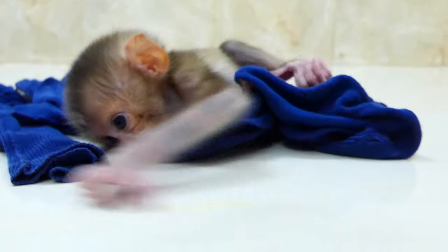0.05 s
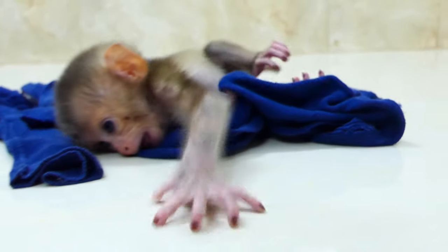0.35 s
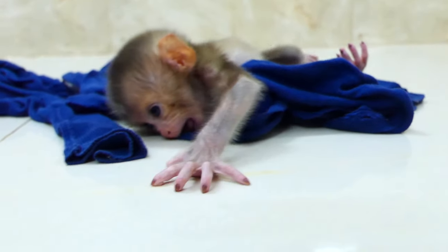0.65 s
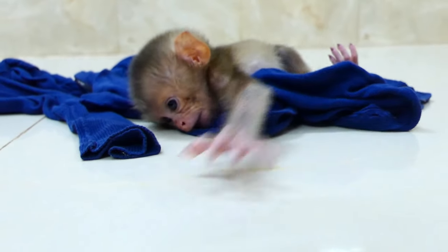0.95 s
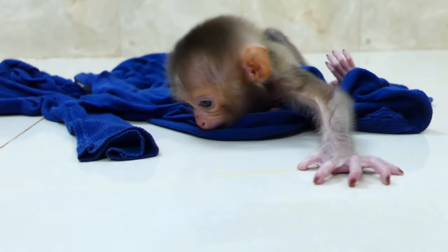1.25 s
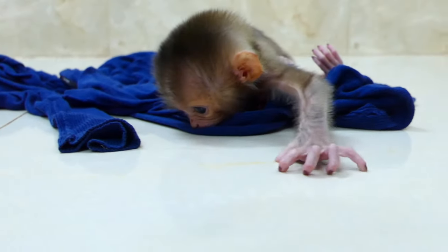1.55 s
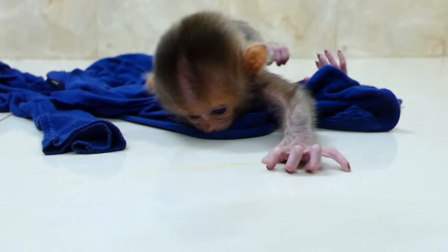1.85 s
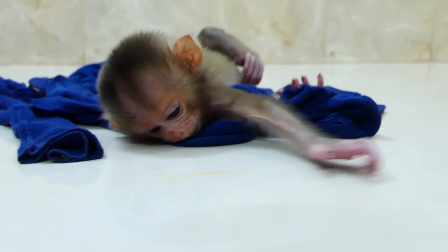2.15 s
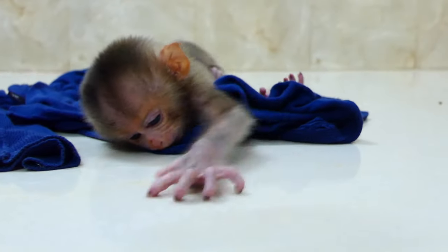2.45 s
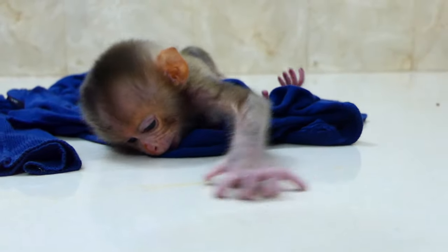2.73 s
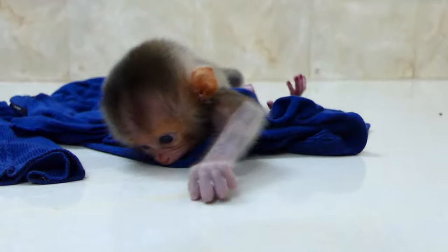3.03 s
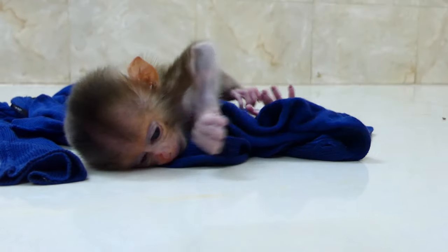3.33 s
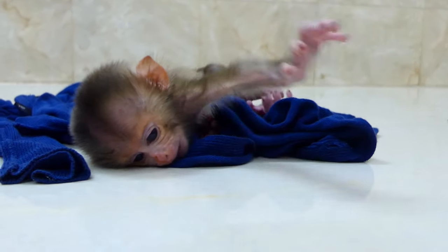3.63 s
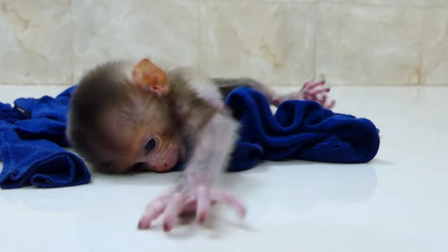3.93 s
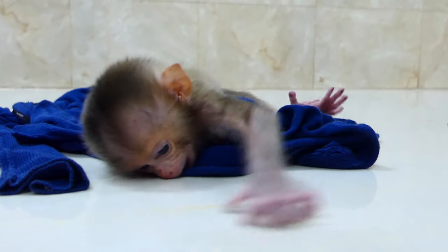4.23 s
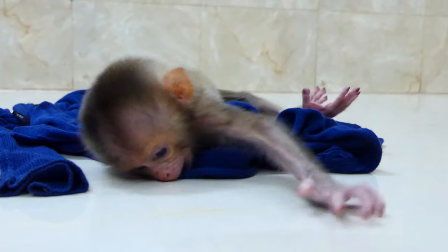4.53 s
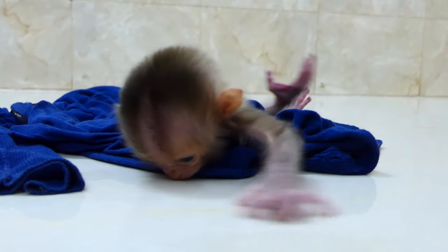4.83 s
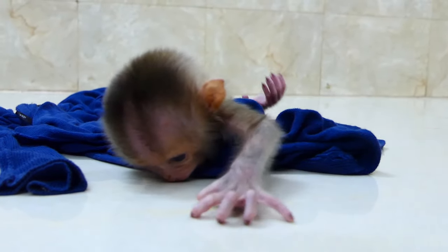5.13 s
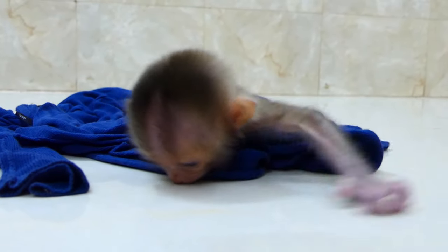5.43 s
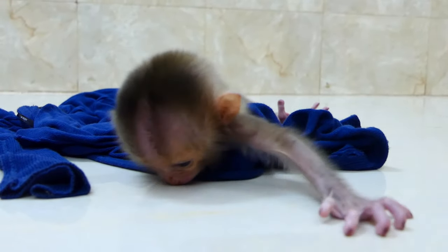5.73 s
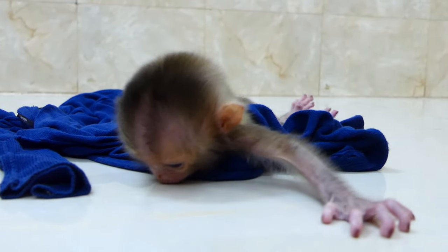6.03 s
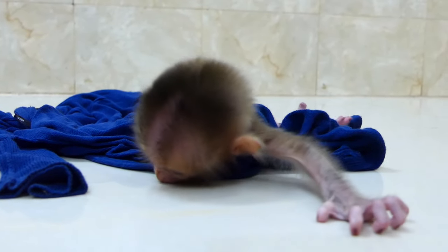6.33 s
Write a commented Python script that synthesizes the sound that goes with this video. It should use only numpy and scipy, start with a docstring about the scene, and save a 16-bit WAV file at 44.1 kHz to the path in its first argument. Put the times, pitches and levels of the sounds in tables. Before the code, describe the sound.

A baby monkey cries ten times, close by in a tiled room. Each call is a short, shrill, ragged scream that starts hard, then falls in pitch and darkens, sometimes with a thin whistle breaking through. Three cries come first, then a pause with soft scuffs of hands and cloth, then seven more about half a second apart. The tiles ring after each cry over a low, steady room noise.

```python
"""In a tiled room, a baby monkey crawls over a cloth on the floor and cries ten times.
Its vocal folds make shrill, ragged screams that start hard, fall in pitch and darken as the mouth
closes; now and then a pure whistle breaks out. Hands and cloth scuff softly over a low room noise.
The tiles ring after each cry. A camera's gain control turns the loud cries down and lets the echo
swell back."""
import sys
import numpy as np
from scipy import signal
from scipy.fft import rfft, irfft, next_fast_len
from scipy.io import wavfile
from scipy.ndimage import uniform_filter1d, map_coordinates

SR = 44100
rng = np.random.default_rng(int(sys.argv[2]) if len(sys.argv) > 2 else 0)


def unload_audio(sound):
    """Save the sound as a 16-bit wav file, at the path given as the first command line argument."""
    columns = np.transpose(np.atleast_2d(sound))
    # keep every value between -1 and 1, then stretch to whole-number steps
    steps = np.round(np.clip(columns, -1, 1) * 32767)
    wavfile.write(sys.argv[1], SR, steps.astype(np.int16))


N = 285768
TOP_HZ = 15700  # the highest frequency kept

# Tone of the low room noise: (frequency [Hz], relative level [dB])
BACKGROUND_COLOUR = [(18, -51), (30, -28), (140, -8.5), (175, 2), (270, -3.5), (455, -13.5), (1170, -13),
                     (2300, -16), (12000, -31), (15500, -57)]
# Stereo width of the room noise: (frequency [Hz], side over middle [ratio])
BACKGROUND_WIDTH = [(40, 0.81), (170, 0.21), (600, 0.47)]
# How long the room rings: (frequency [Hz], time to fade by 60 dB [s])
ECHO_DECAY = [(1500, 0.72), (2900, 0.72), (4800, 0.73), (14000, 0.54)]
# Tone of the echo: (frequency [Hz], gain [dB])
ECHO_COLOUR = [(1300, 1.5), (2050, -5.5), (2950, 1.46), (4800, -1), (7500, 2.5), (10000, -2), (13000, -7.5)]
# Stereo width of the echo: (frequency [Hz], side over middle [ratio])
ECHO_WIDTH = [(1000, 0.53), (7000, 0.25), (12000, 0.58)]
# Stereo width of the direct sound: (frequency [Hz], side over middle [ratio])
DIRECT_WIDTH = [(9000, 0.15), (13000, 0.38)]
# Hands and cloth sliding: (time [s], length [s], slide level [dB], rub frequency [Hz], rub level [dB])
SLIDES = [(0.451, 0.15, -31.5, 850, -49), (1.934, 0.35, -53, 1480, -43.5),
          (2.329, 0.093, -45.5, 3240, -41.5)]
# Tone of a slide: (frequency [Hz], relative level [dB])
SLIDE_COLOUR = [(59, -50), (115, -7.5), (330, 3), (800, 1.5), (3000, -11.5), (5280, -120)]
# A finger or nail on the tiles: (time [s], level [dB], ring [Hz])
FINGER_TAPS = [(2.809, -32.5, 1800)]
# Where throat and mouth ring: (frequency [Hz], width [Hz], gain [dB])
THROAT_RESONANCES = [(2895, 410, -2), (3870, 4000, 1.5), (6270, 2230, 1), (7520, 1030, -5.5),
                     (9100, 3220, 2), (11800, 2300, -4.5)]
# Strength of the mouth's moving resonance, weakest midway: (frequency [Hz], gain [dB])
MOUTH_STRENGTH = [(3800, 8), (5600, -2.5), (9000, 9)]
# Muffling by closed lips: (frequency [Hz], gain [dB])
LIP_MUFFLING = [(5000, -4), (10500, -4.5), (14000, -20)]
# Tone of the throaty undertone: (frequency [Hz], relative level [dB])
CHEST_COLOUR = [(500, -19), (850, -1), (1800, 1.5), (2800, -22)]
# Glides of a second vibration in the voice box:
# (time [s], length [s], first pitch [Hz], last pitch [Hz], level [dB], roughness [0-1])
WHISTLE_GLIDES = [(0.158, 0.041, 8370, 6840, -15, 0.22), (0.184, 0.044, 9650, 9460, -14.5, 0.15),
                  (0.672, 0.022, 12200, 8800, -14, 0.35), (1.229, 0.025, 5440, 5740, -17, 0.25),
                  (1.227, 0.031, 10780, 10260, -15.5, 0.36), (2.861, 0.026, 9870, 9490, -13, 0.05),
                  (2.943, 0.024, 10850, 7500, -16.5, .35), (3.424, 0.011, 4530, 3190, -10, .2),
                  (3.505, 0.016, 8100, 6830, -17.5, 0.12), (4.132, 0.02, 8170, 7280, -14.5, 0.38),
                  (4.56, 0.014, 10420, 8960, -14, .4), (5.008, 0.025, 6660, 6630, -7, 0.45),
                  (5.059, 0.0237, 4370, 3740, -12, 0.55), (5.48, 0.018, 3400, 4000, -15.5, .45),
                  (5.499, 0.012, 3875, 4130, -9.5, 0.01), (5.584, 0.048, 6900, 4920, -9.5, 0.36),
                  (5.979, 0.016, 4040, 4600, -7, 0.42), (5.99, 0.039, 6680, 6710, -8, 0.5)]
# Catches of the voice: (time [s], length [s], first pitch [Hz], last pitch [Hz], mouth resonance [Hz],
# level [dB], brightness [dB per octave], roughness [0-1])
YELP_GLIDES = [(0.269, 0.019, 3765, 3360, 9960, -15, 3, 0.75),
               (0.76, 0.013, 2890, 3415, 3240, -8, -22, 0.5),
               (1.155, 0.044, 4700, 5270, 10000, -26, 9, 0.65),
               (3.412, 0.015, 1420, 1605, 3200, -10.5, -12, 0.18),
               (3.519, 0.0082, 3650, 3310, 3500, -5.5, -25, 0.55),
               (4.197, 0.023, 1855, 1403, 2900, -8.5, -46, 0.4),
               (4.578, 0.014, 1507, 1410, 3200, -7, -13, 0.2),
               (5.004, 0.027, 2285, 2504, 4560, -12, 1, 0.77),
               (5.135, 0.022, 902, 806, 3630, -8, -16, 0.55),
               (5.621, 0.014, 1388, 1720, 3200, -6.5, -44, 0.64),
               (6.091, 0.013, 3040, 3110, 3030, -2, -19, 0.82),
               (6.139, 0.019, 1029, 929, 2770, -10.5, -27, 0.43)]
# Screams, held high before they break and fall: (time [s], attack [s], hold [s], fall [s],
# mouth closing [s], scoop up to the pitch [octaves], held pitch [Hz], last pitch [Hz], open mouth [Hz],
# closed mouth [Hz], held level [dB], break level [dB], falling level [dB],
# held brightness [dB per octave], falling brightness [dB per octave], held roughness [0-1],
# falling roughness [0-1], period doubling [0-1])
SCREAMS = [(0.151, 0.0012, 0.059, 0.034, 0.019, -0.22, 4993, 3160, 10500, 3340, -16.5, -10.5, -16, -1, 5, 0.36, 0.2, 0.17),
           (.603, 0.0028, 0.08, 0.074, 0.05, 0.29, 5930, 2151, 10500, 2980, -11, -10, -4.5, 2.5, -16, 0.81, 0.41, 0.59),
           (1.198, 0.039, 0.1, 0.066, 0.057, 0.15, 5150, 2750, 9950, 3020, -11.5, -5, -9.5, 4, -33, 0.78, 0.43, 0.32),
           (2.859, 0.0034, 0.087, 0.079, 0.042, .35, 5327, 1949, 10230, 2870, -10, -13, -6.5, 4, -70, 0.87, 0.6, 0.17),
           (3.408, 0.011, 0.093, 0.077, 0.033, 0.23, 4784, 2500, 10030, 3010, -9, -12.5, -7, -0.5, -46, 0.91, 0.51, 0.35),
           (4.055, 0.0069, 0.076, .066, 0.026, .2, 4090, 2303, 9970, 2810, -12.5, -9, -2, -1.5, -39, 0.98, 0.43, 0.34),
           (4.552, 0.0057, .105, .062, 0.046, .5, 4682, 1685, 10000, 2700, -10, -14.5, -3, -0.5, -63, 0.73, 0.53, 0.69),
           (4.993, 0.0057, 0.085, 0.081, 0.03, 0.21, 3605, 1550, 8660, 3040, -19.5, -7.5, -5.5, 0.5, -10, 0.65, 0.5, 0.62),
           (5.453, 0.0012, 0.118, 0.039, 0.038, 0.46, 4012, 3225, 9200, 3670, -14.5, -8.5, -11, -2.5, 4, 0.63, 0.27, 0.95),
           (5.968, 0.0079, 0.12, 0.059, 0.035, -.15, 3498, 1250, 6700, 2780, -12, -10.5, -9, 1, -27, 0.6, 0.52, 0.64)]


def amp(db):
    """Turn decibels into a gain."""
    return 10 ** (np.asarray(db) / 20)


def unit(x):
    """Scale x to an average (rms) level of 1."""
    return x / np.sqrt(np.mean(x ** 2) + 1e-20)


def along(points, hz):
    """Read between (frequency, value) points on a log frequency axis."""
    frequencies, values = np.transpose(points)
    return np.interp(np.log(hz + 1), np.log(frequencies + 1), values)


def wobble(rate, n):
    """A smooth curve of n samples through `rate` random values a second."""
    return map_coordinates(rng.standard_normal(int(n * rate / SR) + 4), [np.arange(n) * rate / SR])


def filtered(x, response):
    """Multiply each frequency in x by response(hz)."""
    n = x.shape[-1]
    padded = next_fast_len(n + SR // 10)
    return irfft(rfft(x, padded) * response(np.fft.rfftfreq(padded, 1 / SR)), padded)[..., :n]


def add(track, start, sound):
    """Mix a sound into the track at `start` seconds."""
    part = track[round(start * SR):][:len(sound)]
    part += sound[:len(part)]


def gate(n, rise, fall):
    """A straight fade in and fade out over n samples; rise and fall are in seconds."""
    t = np.arange(n) / SR
    return np.clip(np.minimum(t / rise, t[::-1] / fall), 0, 1)


def noise(colour, shape):
    """Noise of level 1 with the given tone."""
    return unit(filtered(rng.standard_normal(shape), lambda hz: amp(along(colour, hz))))


def resonate(x, hz, width):
    """Let x ring around a frequency, which may move."""
    turn = np.exp(2j * np.pi * np.cumsum(hz * np.ones(len(x))) / SR)
    keep = np.exp(-np.pi * width / SR)
    return 2 * np.real(turn * signal.lfilter([1 - keep], [1, -keep], x / turn))


def steep_resonance(x, hz, width):
    """The same resonance twice, so less gets past its sides."""
    return resonate(resonate(x, hz, width), hz, width)


def stereo(mid, side, width):
    """Left and right: what both share, plus or minus a side signal scaled by the width table."""
    side = filtered(side, lambda hz: along(width, hz))
    return np.array([mid + side, mid - side])


def room_noise(db=-41):
    """The steady, low background of the house."""
    mid, side = noise(BACKGROUND_COLOUR, (2, N))
    return amp(db) * stereo(mid, side, BACKGROUND_WIDTH)


def room_echo(x, buildup_s=0.14):
    """Reflections from the tiles build up and die away, the highest treble first."""
    hz, t, spectrum = signal.stft(rng.standard_normal((2, SR)), SR, nperseg=256)
    decay = amp(-60 * t / along(ECHO_DECAY, hz)[:, None])
    buildup = 1 - np.exp(-t / buildup_s) / 2
    tail = signal.istft(spectrum * decay * buildup, SR, nperseg=256)[1]
    coloured = filtered(x, lambda hz: amp(along(ECHO_COLOUR, hz)))
    mid, side = signal.fftconvolve(coloured[None], tail / np.linalg.norm(tail[0]), axes=1)[:, :N]
    return stereo(mid, side, ECHO_WIDTH)


def low_hum(start=3.25, length=0.11, hz=298, waver_hz=25, db=-34):
    """A brief, faint hum with a wavering pitch."""
    track, n = np.zeros(N), int(length * SR)
    phase = 2 * np.pi * np.cumsum(hz + waver_hz * wobble(78, n)) / SR
    add(track, start, amp(db) * unit(np.sin(phase)) * gate(n, length / 2, length / 2))
    return track


def crawling(grip_db=3.0, grip_rate=150, rub_width=0.86):
    """Hands and cloth grip unevenly: each slide starts fast and runs out, and a rub swells midway."""
    track = np.zeros(N)
    for start, length, db, rub_hz, rub_db in SLIDES:
        n = int(length * SR)
        slide = noise(SLIDE_COLOUR, n) * amp(db) * gate(n, length / 20, length / 2)
        rub = steep_resonance(rng.standard_normal(n), rub_hz, rub_width * rub_hz)
        rub = unit(rub) * amp(rub_db) * gate(n, length / 2, length / 2)
        add(track, start, (slide + rub) * amp(grip_db * wobble(grip_rate, n)))
    return track


def finger_tap(width_hz=1500, decay_s=0.012):
    """A light touch on the tiles makes a small tick that dies quickly."""
    track, t = np.zeros(N), np.arange(SR // 10) / SR
    for start, db, hz in FINGER_TAPS:
        tick = unit(resonate(rng.standard_normal(len(t)), hz, width_hz))
        add(track, start, tick * amp(db - 60 * t / decay_s))
    return track


def wheeze(start=1.14, length=0.14, first_hz=1550, last_hz=2400, width_hz=800, db=-35):
    """A faint, rising rasp from the monkey leads into the third cry."""
    track, n = np.zeros(N), int(length * SR)
    rasp = steep_resonance(rng.standard_normal(n), np.geomspace(first_hz, last_hz, n), width_hz)
    add(track, start, amp(db) * unit(rasp) * gate(n, length / 4, length / 10))
    return track


def strained_phase(pitch, rough, jitter=0.0595, jitter_rate=2000, lurch=0.04, lurch_rate=220):
    """The phase of a strained vibration: its pitch shakes fast and lurches every few milliseconds."""
    shakes = jitter * rough * wobble(jitter_rate, len(pitch))
    lurches = lurch * np.sqrt(rough) * wobble(lurch_rate, len(pitch))
    return 2 * np.pi * np.cumsum(pitch * (1 + shakes + lurches)) / SR


def vocal_folds(pitch, rough, doubling, pulse_depth=0.77):
    """The folds buzz with many overtones; roughness turns the buzz into pulsing noise."""
    phase = strained_phase(pitch, rough)

    def overtones(multiples):
        return np.sum(np.cos(multiples * phase) * (multiples * pitch < TOP_HZ), axis=0)

    whole = np.arange(1, 20)[:, None]
    tone = overtones(whole) + doubling * overtones(whole + 0.5)  # period doubling adds tones in between
    tone *= 2 * np.sqrt(pitch / SR)  # as strong per Hz as the noise
    rasp = rng.standard_normal(len(pitch)) * (1 + pulse_depth * np.cos(phase))
    return np.sqrt(1 - rough ** 2) * tone + rough * rasp


def throat(buzz, bright, mouth_hz, mouth_width_hz=1400, pivot_hz=5000, bass_cut_hz=2200):
    """Steady resonances and a moving one shape the buzz; a bright voice drives the high ones harder."""
    resonances = [*THROAT_RESONANCES, (mouth_hz, mouth_width_hz, along(MOUTH_STRENGTH, mouth_hz))]
    shaped = sum(amp(db + bright * np.log2(hz / pivot_hz)) * steep_resonance(buzz, hz, width)
                 for hz, width, db in resonances)
    # a small mouth gives off little bass
    return signal.sosfilt(signal.butter(4, bass_cut_hz, "high", fs=SR, output="sos"), shaped)


def lips(sound, mouth_hz, open_hz=9500, closed_hz=5000):
    """The closing lips muffle the treble as the mouth's resonance drops."""
    closed = np.clip((open_hz - mouth_hz) / (open_hz - closed_hz), 0, 1)
    muffled = filtered(sound, lambda hz: amp(along(LIP_MUFFLING, hz)))
    return (1 - closed) * sound + closed * muffled


def chest(buzz, pitch, relative_db=-21.5, full_below_hz=1700, fade_db_per_octave=10):
    """A throaty undertone that fades as the pitch gets higher."""
    octaves_above = np.maximum(np.log2(pitch / full_below_hz), 0)
    undertone = unit(filtered(buzz, lambda hz: amp(along(CHEST_COLOUR, hz))))
    return amp(relative_db - fade_db_per_octave * octaves_above) * undertone


def voice(pitch, mouth_hz, db, bright, rough, doubling, flutter_db=2.1, flutter_rate=300):
    """The folds sound through throat, lips and chest, fluttering and flipping from squeak to rasp."""
    n = len(pitch)
    rough = np.clip(rough * (1 + 0.2 * wobble(150, n)), 0, 1)  # the roughness comes and goes
    buzz = vocal_folds(pitch, rough, doubling)
    sound = lips(throat(buzz, bright, mouth_hz), mouth_hz)
    running_level = np.sqrt(np.abs(uniform_filter1d(sound ** 2, size=192)) + 1e-12)
    sound = sound / running_level + chest(buzz, pitch)
    flutter = flutter_db * rough * wobble(flutter_rate, n)
    return sound * amp(db + flutter) * gate(n, rise=0.001, fall=0.00155)


def whistles(flutter_db=6, flutter_rate=350):
    """A second vibration in the voice box squeaks out of the screams; rough ones waver and stutter."""
    track = np.zeros(N)
    for start, length, first_hz, last_hz, db, rough in WHISTLE_GLIDES:
        n = int(length * SR)
        tone = np.sin(strained_phase(np.geomspace(first_hz, last_hz, n), rough))
        flutter = amp(flutter_db * rough * wobble(flutter_rate, n))
        add(track, start, amp(db) * unit(tone * flutter) * gate(n, rise=0.0015, fall=0.0012))
    return track


def yelps():
    """The voice catches in brief glides before, in or after a cry."""
    track = np.zeros(N)
    for start, length, first_hz, last_hz, mouth_hz, db, bright, rough in YELP_GLIDES:
        n = int(length * SR)
        yelp = voice(np.geomspace(first_hz, last_hz, n), mouth_hz, db, bright, rough, doubling=0.11)
        add(track, start, yelp * gate(n, rise=0.0015, fall=0.0032))
    return track


def scream(row, scoop_s=0.022, droop_octaves=0.1, bend_octaves=0.05, bend_rate=70, opening_octaves=0.22,
           sag_db=2, fade_db=6, onset_rough=0.42, onset_s=0.014):
    """One cry: a harsh start, a held shriek, then a dive in pitch while the closing mouth darkens it."""
    (attack, hold, fall, closing, scoop, held_hz, last_hz, open_hz, closed_hz,
     held_db, break_db, fall_db, held_bright, fall_bright, held_rough, fall_rough, doubling) = row
    t = np.arange(int((hold + fall) * SR)) / SR
    fallen = np.clip((t - hold) / fall, 0, 1) ** 0.8  # the pitch drops fastest just after the break
    closed = np.clip((t - hold) / closing, 0, 1)
    past_mid_hold = np.minimum(t / hold, 1) - 0.5
    arch = -scoop * np.exp(-t / scoop_s) - droop_octaves * past_mid_hold
    bends = bend_octaves * (1 - fallen) * wobble(bend_rate, len(t))
    pitch = held_hz * (last_hz / held_hz) ** fallen * 2 ** (arch + bends)
    opening_hz = open_hz * 2 ** (opening_octaves * past_mid_hold)
    mouth_hz = opening_hz * (closed_hz / opening_hz) ** closed
    effort_db = np.interp(t, [0, hold / 2, hold, hold + fall / 2, hold + fall],
                          [held_db, held_db - sag_db, break_db, fall_db, fall_db - fade_db])
    bright = held_bright + (fall_bright - held_bright) * closed ** 2
    rough = held_rough + (fall_rough - held_rough) * closed ** 2 + onset_rough * np.exp(-t / onset_s)
    sound = voice(pitch, mouth_hz, effort_db, bright, rough, doubling * (1 + closed) / 2)
    return sound * np.minimum(t / attack, 1)


def monkey(dip_db=1, handover_s=0.0025):
    """All the monkey's calls; a scream dips a little while a whistle or yelp takes the air."""
    screams, air_taken = np.zeros(N), np.zeros(N)
    for start, *row in SCREAMS:
        add(screams, start, scream(row))
    for start, length, *_ in [*WHISTLE_GLIDES, *YELP_GLIDES]:
        add(air_taken, start, gate(int(length * SR), handover_s, handover_s))
    return screams * amp(-dip_db * np.minimum(air_taken, 1)) + yelps() + whistles() + wheeze()


def scene(echo_db=-5):
    """The monkey close by, with the room's echo and low noise around it, in stereo."""
    near = monkey() + crawling() + finger_tap() + low_hum()
    # 1j shifts the phase: the top treble reaches the two microphones least alike
    side = filtered(near, lambda hz: 1j * along(DIRECT_WIDTH, hz))
    balance = amp([[0.4], [-0.4]])  # slightly to the left
    direct = np.array([near + side, near - side]) * balance
    return direct + amp(echo_db) * room_echo(near) + room_noise()


def gain_control(x, threshold_db=-21, slope=0.72, attack_s=0.004, recovery_db_per_s=30):
    """The volume drops quickly when the sound passes the threshold, then creeps back up."""
    power = uniform_filter1d(np.mean(x ** 2, axis=0), size=256)
    level_db = 10 * np.log10(np.abs(power) + 1e-12)
    needed_cut_db = slope * np.maximum(level_db - threshold_db, 0)
    recovery_db = recovery_db_per_s * np.arange(N) / SR
    held_cut_db = np.maximum.accumulate(needed_cut_db + recovery_db) - recovery_db
    keep = np.exp(-1 / (attack_s * SR))
    smooth_cut_db = signal.lfilter([1 - keep], [1, -keep], held_cut_db)
    return x * amp(-smooth_cut_db)


def record(dry):
    """The camera turns loud moments down and keeps nothing above TOP_HZ."""
    return filtered(gain_control(dry), lambda hz: hz < TOP_HZ)


dry = scene()
out = record(dry)
unload_audio(out)
```